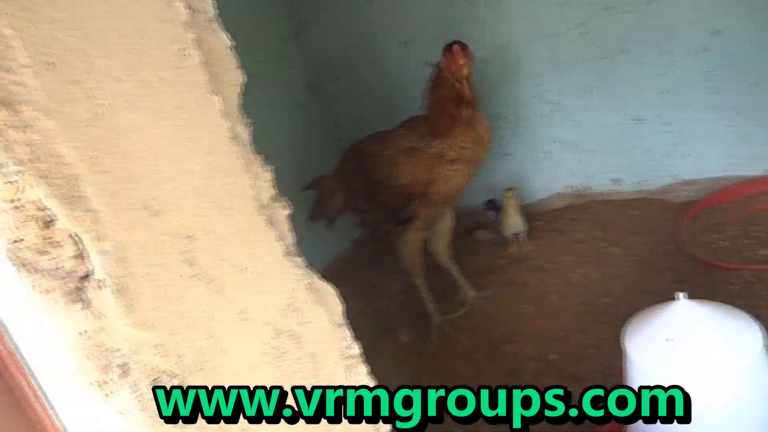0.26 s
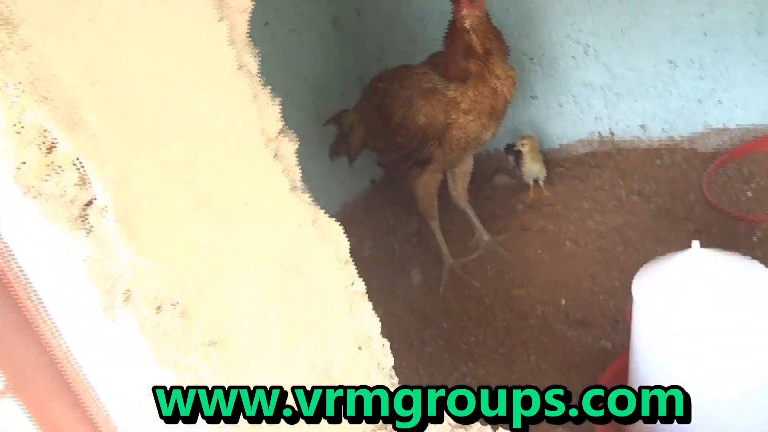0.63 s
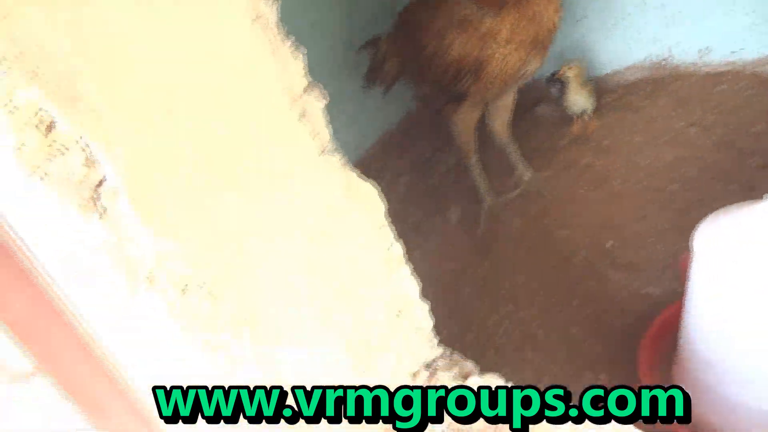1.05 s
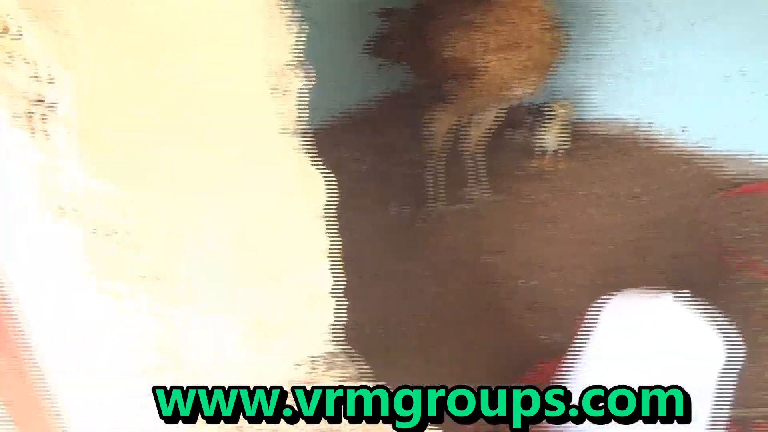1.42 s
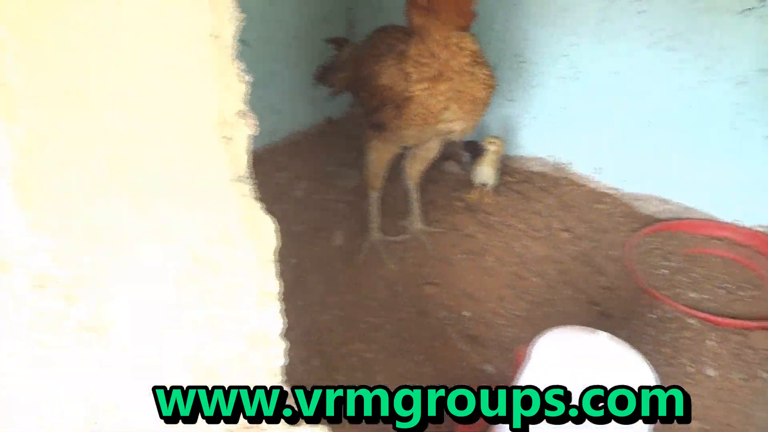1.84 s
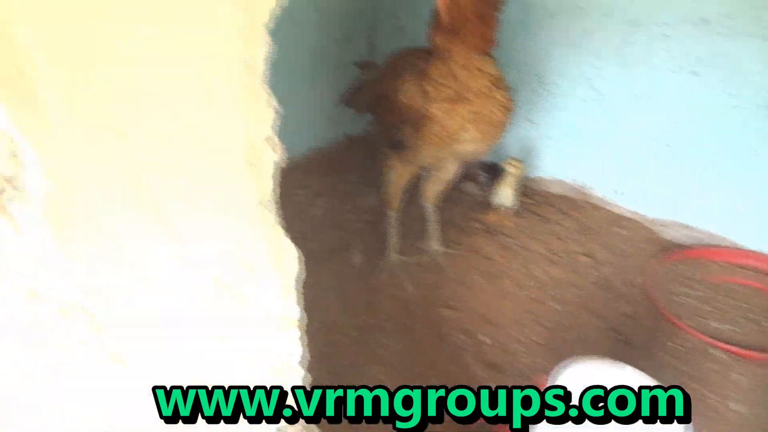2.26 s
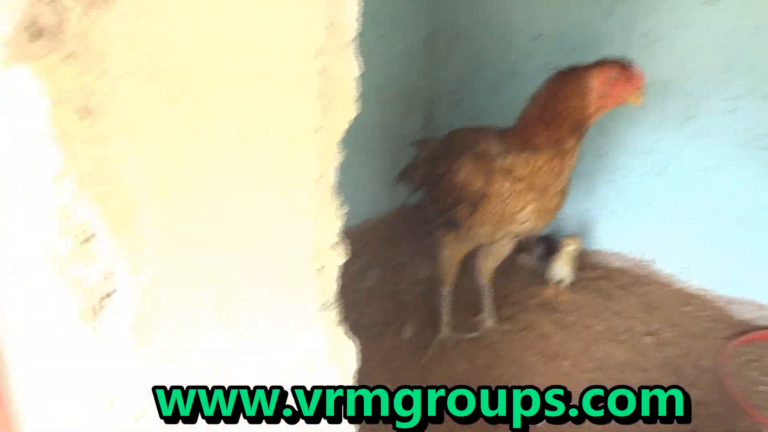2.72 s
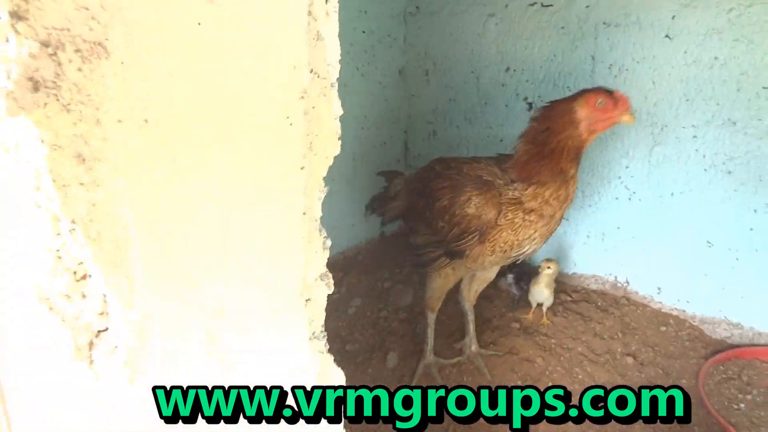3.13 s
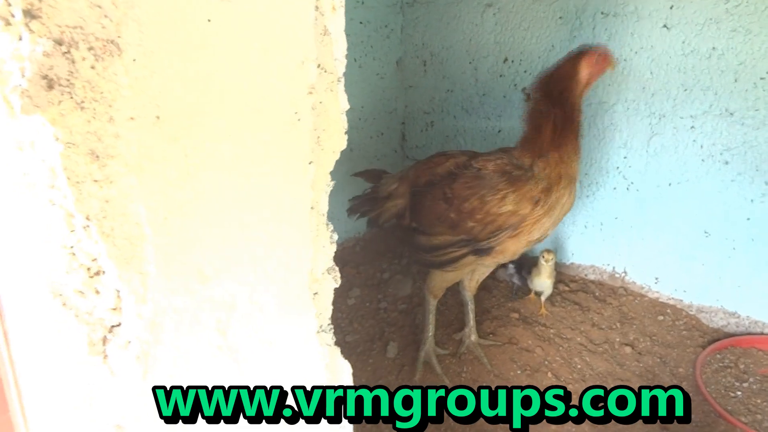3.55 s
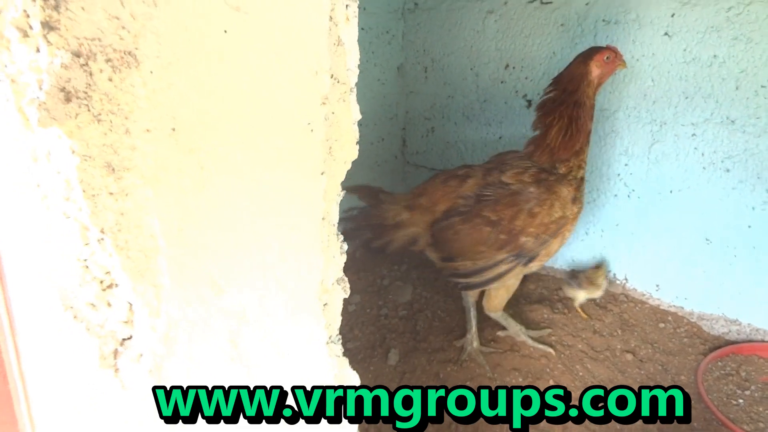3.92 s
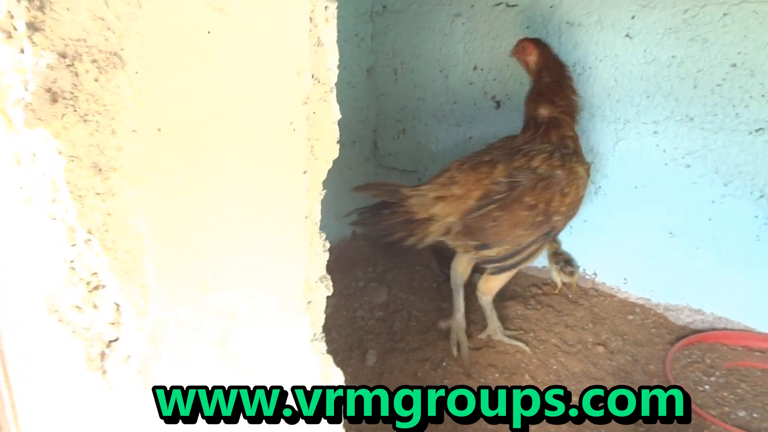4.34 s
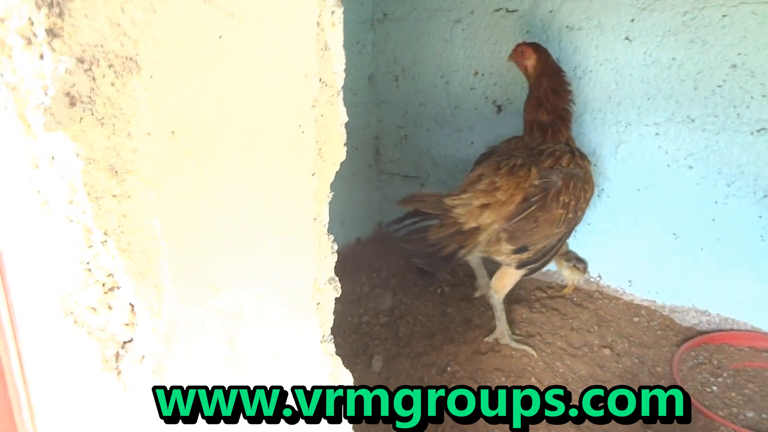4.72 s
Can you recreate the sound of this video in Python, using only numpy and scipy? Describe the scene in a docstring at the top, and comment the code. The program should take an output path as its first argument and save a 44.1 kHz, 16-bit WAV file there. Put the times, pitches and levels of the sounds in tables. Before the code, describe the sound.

A hen growls in short harsh rattling bursts, then clucks and wavers softly while a chick peeps beside her in a small shed.

```python
"""Broody hen and chick in a shed

A broody hen growls in short harsh bursts in a small plastered shed, close to the microphones, then wavers softly.
Her growl is noise and pulses from slack membranes, through resonances of chest, windpipe and mouth; her calls are
a few partials. A chick beside her and more further off peep in falling whistles. Feet scratch the litter in dry
grains and snaps, and a small metal part tinks as decaying sines. Rush, hiss and hum lie behind."""
import sys
import numpy as np
from scipy import signal
from scipy.fft import rfft, irfft, next_fast_len
from scipy.io import wavfile
from scipy.ndimage import uniform_filter1d, map_coordinates

SR = 44100
rng = np.random.default_rng(int(sys.argv[2]) if len(sys.argv) > 2 else 0)


def store_wav(level_fs):
    """Save 16-bit WAV to argv[1]."""
    pcm = np.round(np.clip(np.atleast_2d(level_fs), -1, 1) * 32767)
    wavfile.write(sys.argv[1], SR, pcm.T.astype(np.int16))


N = 219132
T = np.arange(N) / SR

# the hen's wavering calls: start_s, length_s, first_hz, middle_hz, last_hz, level_db,
# first_partial_db (over the level), roughness (0-1)
SOFT_CALLS = [(3.716, .12, 570, 675, 575, -29, -4, 0.14), (3.84, 0.079, 620, 637, 653, -54, 9.5, 0.25),
              (3.989, .065, 560, 702, 689, -29, -5.5, 0.14), (4.044, 0.084, 739, 756, 547, -32, -2.5, 0.24),
              (4.113, 0.057, 580, 556, 550, -51.5, 8.5, 0.1), (4.165, .18, 560, 710, 638, -29, -5, 0.12),
              (4.355, .14, 560, 666, 582, -31, -4.5, 0.15), (4.488, 0.05, 640, 666, 657, -48.5, 11.5, 0.3),
              (4.773, 0.08, 490, 523, 557, -39.5, 6.5, 0.11),
              (4.827, .15, 625, 635.6, 635, -35.5, -4.5, .08)]
ATTACK_S, RELEASE_S = .01, .018  # of calls and quiet notes
# background over time: time_s, rumble_db, hiss_db, far_chicks_db (before distance)
BACKGROUND = [(0.0, -44, -38, -28.5), (0.25, -46.5, -49.5, -46), (0.9, -46.5, -56.5, -48),
              (1.6, -51, -55, -45), (1.85, -44.5, -57, -39.5), (2.15, -49, -48, -42),
              (2.28, -47, -57.5, -39.5), (2.45, -38, -48, -38.5), (2.7, -47.5, -52.5, -43),
              (3.0, -46, -49, -44.5), (3.4, -43, -53.5, -43.5), (3.75, -45, -44.5, -38),
              (4.3, -41, -47.5, -44.5), (4.7, -44, -51.5, -43.5), (4.97, -43, -53, -34.5)]


def growl():
    """Slack membranes slap shut three times in every flutter cycle, unevenly, into chest, windpipe and mouth."""
    # throat colour with the beak nearly shut, half open and open: frequency_hz, density_db (per Hz)
    throat_shut = [(120, -46.5), (200, -3.5), (296, -1.5), (345, -3), (478, 2), (527, 1), (824, -18.5),
                   (889, -20), (1070, -2.5), (1220, -19), (1390, -10), (1790, -18.5), (2700, -26),
                   (3510, -36), (5940, -120)]
    throat_half = [(120, -58), (200, -28.5), (307, -12.5), (431, -7), (629, 1), (930, -6.5), (1190, -17),
                   (1630, -22.5), (2090, -33.5), (2290, -19), (3380, -22.5), (4500, -33.5), (5850, -107),
                   (9900, -120)]
    throat_open = [(120, -61), (200, -35.5), (311, -1), (420, -4), (473, 3), (538, 12.5), (629, 12.5),
                   (736, -5.5), (872, 17), (1160, -3.5), (1310, -21), (1450, -6.5), (4500, -45),
                   (5850, -72), (9900, -120)]
    # resonance of the chest, passed twice: centre_hz, width_hz, level_db
    chest = [(198, 146, 0)]
    # mouth with the beak nearly shut, open and wide open: centre_hz, width_hz, level_db
    mouth_shut = [(3060, 105, 8), (3460, 52, -8), (4600, 71, -19), (4565, 13, -8)]
    mouth_open = [(2570, 110, 17), (3280, 62, 15.5), (3610, 1200, -4.5)]
    mouth_wide = [(1960, 79, 7), (2510, 110, 4), (3900, 87, 1)]
    # tongue and beak edges: centre_hz, width_hz, level_db
    edges = [(5890, 200, -2), (6500, 170, 6), (7300, 150, -1), (7970, 150, 2), (10350, 200, -4),
             (11700, 200, -2), (12350, 180, -2), (13500, 300, -10), (8300, 13300, -14)]
    flutter_hz, puff_s = 60.17, .0028
    jitter, scatter_db = .17, 2.5  # unevenness of the slaps in time and strength
    breathy, throb, leak = .55, .4, .3
    chest_follows = .6  # dB of chest per dB of drive
    wide_from = .88  # beak opening above which the mouth_wide resonances come in

    drive, beak, deeper_db = effort()
    beak = np.clip(beak, 0, 1)
    chest_db = -18 + (-34.5 + 18) * beak  # beak shut to open, as in the next two
    mouth_db = -7 + (-24.5 + 7) * beak
    edges_db = -15 + (-31.5 + 15) * beak

    flutter = np.cumsum(flutter_hz * (1 + .07 * wobble(14))) / SR  # in cycles
    slaps = np.flatnonzero(np.diff(np.floor(3 * flutter + jitter * wobble(180))) > 0)
    pulses = np.zeros(N)
    pulses[slaps] = amp(scatter_db * rng.standard_normal(len(slaps)))
    # air escapes after each slap, over a steady leak
    puffs = leak + signal.lfilter([1], [1, -np.exp(-1 / (puff_s * SR))], pulses)
    soft_slaps = filtered(unit(pulses), lambda f: 1 / (1 + 1j * f / 4000))  # a slap is not sharp
    swell = 1 + throb * np.sin(2 * np.pi * flutter)
    source = swell * (soft_slaps + breathy * unit(puffs * rng.standard_normal(N)))
    airy = swell * (0.039 * unit(pulses) + unit(puffs * rng.standard_normal(N)))

    def through(x, control, response):
        """A controlled source sent through a resonator, scaled by the level it gives uncontrolled."""
        return filtered(x * control, response) / np.std(filtered(x, response))

    chest_drive = drive ** chest_follows * amp(chest_db + deeper_db)
    voice = through(source + airy, chest_drive, lambda f: modes(chest)(f) ** 2)
    for opening, throat in [(0, throat_shut), (.5, throat_half), (1, throat_open)]:
        share = np.clip(1 - 2 * abs(beak - opening), 0, 1)  # the throat's shape follows the beak
        voice += through(source, drive * np.sqrt(share), windpipe(throat))
    wide = np.clip((beak - wide_from) / (1 - wide_from + 1e-3), 0, 1)
    mouths = [(1 - beak ** 2, mouth_shut), (beak ** 2 * (1 - wide), mouth_open), (3 * wide, mouth_wide)]
    for share, mouth in mouths:
        ring = lambda f: modes(mouth)(f) * f ** 2 / (f ** 2 + 2200 ** 2)
        voice += through(source, drive * amp(mouth_db) * np.sqrt(share), ring)
    hiss = lambda f: modes(edges)(f) * f ** 4 / (f ** 4 + 4500 ** 4)
    return voice + through(airy, drive * amp(edges_db), hiss)


def effort():
    """Drive, beak opening and extra chest dB of the slack membranes: growls, clucks and the rattle under calls."""
    # long growls, one list of points each: time_s, level_db, beak_opening (0-1)
    growl_points = [
        [(0.0, -16, 0.7), (0.06, -17, 0.64), (0.15, -19.5, 0.57), (0.22, -18, .7), (0.295, -23.5, 0.67),
         (0.33, -35.5, 0.34), (0.36, -80, 0.6)],
        [(0.38, -45, 0.6), (0.45, -35, 0.46), (0.53, -46.5, 0.38), (0.66, -41, 0.5), (0.79, -54, 0)],
        [(1.017, -25.5, .9), (1.04, -16, 1), (1.17, -17, 0.91), (1.32, -20, 0.81), (1.4, -18, 0.43),
         (1.6, -18.5, 0.22), (1.65, -21, 0.22), (1.69, -33, 0), (1.73, -83, .1)],
        [(1.893, -28.5, 0), (1.91, -22, 0.13), (1.965, -25, 0.09), (2.06, -20, 0.21), (2.155, -19.5, .2),
         (2.2, -29, 0.08), (2.24, -58, 0)],
        [(2.877, -29, 0.77), (2.905, -19.5, 0.37), (2.93, -16.5, .75), (3.1, -18, 0.73), (3.125, -30, 0.33),
         (3.165, -65, 0)],
        [(3.57, -24, 0.24), (3.6, -26.5, 0.36), (3.65, -24.5, 0.37), (3.707, -24.5, 0.48), (3.73, -60, 0.7)],
    ]
    # clucks: start_s, length_s, level_db, beak_opening (0-1)
    clucks = [(1.002, 0.0073, -36, 0.9), (2.478, .045, -20, 0.21), (2.544, 0.023, -26.5, 0.3),
              (2.796, 0.0071, -25.5, .5), (2.818, 0.029, -14.5, 0.49), (3.46, 0.0053, -33, 0.46),
              (3.485, .075, -15.5, 0.52), (3.914, 0.048, -19.5, 0.62), (4.209, 0.062, -19, 0.5),
              (4.582, 0.039, -19.5, 0.5), (4.645, 0.018, -37, 0.33), (4.702, 0.032, -46.5, .5),
              (4.743, 0.039, -39, 0.32), (4.901, 0.045, -22, 0.39)]
    start_db, end_db = -8, -4  # of a cluck, relative to its peak
    peak_place, cluck_release_s = .45, .025  # place of the peak in the cluck, 0-1
    cluck_chest_db = 6  # a cluck is pushed from deeper in the chest than a growl
    rattle_db, rattle_beak = 6.5, .5

    tables = [[(*row, 0) for row in rows] for rows in growl_points]
    for s, length, db, beak in clucks:
        shape = [(0, start_db), (peak_place * length, 0), (length, end_db), (length + cluck_release_s, -35)]
        tables.append([(s + t, db + change_db, beak, cluck_chest_db) for t, change_db in shape])
    # the slack membranes rattle along under each call, in step with its roughness
    for s, length, _, _, _, db, _, rough in SOFT_CALLS:
        rough_db = 20 * np.log10(np.clip(rough, .05, 1))
        tables.append(burst(s, length, db + rattle_db + rough_db, ATTACK_S, RELEASE_S, rattle_beak, 0))
    return loudest(tables)


def windpipe(throat):
    """Narrow fixed resonances standing on the throat's broad colour."""
    # windpipe resonances: centre_hz, width_hz, level_db
    pipe = [(299, 20.4, 2.5), (400, 24, 0.5), (485, 12.5, 0), (600, 160, -12), (827, 54, 0.5),
            (1046, 39, -3), (1407, 35, -1), (1530, 19, -20), (1695, 11, -25), (2080, 61, 7),
            (2245, 66, 1.5)]

    def gain(f):
        peaks = sum(abs(modes([mode])(f)) ** 2 for mode in pipe)
        return amp(along(throat, f)) * np.sqrt(1 + 2 * peaks)
    return causal(gain)


def calls():
    """A taut membrane sings a few partials; roughness shakes pitch and strength and sets every second cycle apart."""
    # the pitch glides from its first value to the middle one, then to its last
    glide_in_s, glide_out_s = .02, .026
    first_slope_db, second_slope_db = 3, -9.5  # partial level per 100 Hz that the pitch is under the middle one
    third_hz, third_width_hz = 1970, 90  # a mouth resonance that favours the third partial
    out = np.zeros(N)
    shakes = np.array([wobble(60), wobble(90), wobble(150)])
    for s, length, first_hz, middle_hz, last_hz, db, first_db, rough in SOFT_CALLS:
        start = round(s * SR)
        t = T[:min(round(length * SR), N - start)]
        slow, middle, fast = np.clip(rough, .05, 1) * shakes[:, start:][:, :len(t)]
        glide_in_hz = (first_hz - middle_hz) * np.exp(-t / glide_in_s)
        glide_out_hz = (last_hz - middle_hz) * np.exp((t - length) / glide_out_s)
        pitch_hz = middle_hz + glide_in_hz + glide_out_hz
        under = (middle_hz - pitch_hz) / 100
        first = amp(first_slope_db * under) * amp(first_db + 25.0 * middle)
        second = amp(second_slope_db * under)
        third = np.sqrt(second) * amp(-14.5) / np.hypot(1, (3 * pitch_hz - third_hz) / third_width_hz)
        phase = 2 * np.pi * np.cumsum(pitch_hz * (1 + .12 * fast)) / SR
        # the half-pitch partial makes every second cycle differ
        tone = first * (np.sin(phase) + rough * amp(-8) * np.sin(phase / 2))
        tone += second * np.sin(2 * phase)
        tone += third * (np.sin(3 * phase) + amp(-14) * np.sin(4 * phase))
        add(out, s, np.sqrt(2) * amp(db + 7 * slow) * fade(t, length) * tone)
    return out


def quiet_notes():
    """Quiet low notes and two short higher clucks: six thin wavering partials."""
    # notes and clucks: start_s, length_s, first_hz, last_hz, level_db
    notes = [(0.379, 0.19, 199.4, 187.5, -41), (0.415, 0.053, 463, 464, -38), (0.575, 0.022, 695, 690, -26),
             (0.589, 0.215, 243.8, 239.3, -46.5)]
    # throat gain for each partial: frequency_hz, level_db
    throat = [(150, 1), (500, -1), (850, -3), (1200, -26), (1600, -43)]
    out, waver = np.zeros(N), wobble(29.76)
    for s, length, first_hz, last_hz, db in notes:
        t = T[:round(length * SR)]
        shake = waver[round(s * SR):][:len(t)]
        pitch_hz = (first_hz + (last_hz - first_hz) * t / length) * (1 + .012 * shake)
        phase = 2 * np.pi * np.cumsum(pitch_hz) / SR
        tone = np.zeros(len(t))
        for k in range(1, 7):
            partial_db = along(throat, k * pitch_hz) + 3 * np.roll(shake, 900 * k)
            tone += amp(partial_db) * np.sin(k * phase)
        add(out, s, amp(db) * unit(tone) * fade(t, length))
    return out


def chick():
    """The chick beside the hen gives single falling peeps."""
    # peeps: start_s, length_s, first_hz, last_hz, level_db
    peeps = [(0.291, 0.039, 3700, 2830, -36.5), (0.382, 0.046, 4500, 3010, -31.5),
             (0.404, 0.071, 3600, 3100, -38), (0.511, 0.039, 4500, 3050, -32),
             (0.493, 0.028, 5150, 4900, -50), (0.69, 0.023, 5120, 4950, -50),
             (0.564, 0.033, 3500, 2470, -39), (0.623, 0.026, 3900, 3300, -38),
             (0.704, 0.046, 4500, 3020, -31), (1.692, 0.04, 3400, 2970, -46),
             (1.71, 0.037, 4200, 3900, -42), (1.858, 0.012, 3400, 3020, -41), (2.228, .03, 3450, 3080, -51),
             (2.666, 0.052, 4500, 3700, -43), (3.136, 0.038, 3600, 2930, -36.5),
             (3.22, 0.014, 3400, 2970, -45), (3.244, 0.026, 3900, 3210, -37),
             (3.289, 0.064, 4150, 3780, -42), (3.35, 0.042, 3900, 3120, -38),
             (3.643, 0.045, 4500, 3360, -33), (3.982, 0.025, 4200, 2840, -29),
             (4.022, 0.041, 3700, 3480, -37), (4.072, 0.044, 4300, 3060, -31),
             (4.161, 0.045, 3500, 3070, -41), (4.196, 0.03, 4600, 3640, -36),
             (4.312, 0.079, 3800, 2954, -45), (4.402, 0.074, 4600, 2930, -39),
             (4.536, 0.038, 4700, 3700, -37.5), (4.604, 0.048, 4000, 3530, -34.5),
             (4.809, 0.063, 4900, 3480, -37)]
    out = np.zeros(N)
    for s, *shape in peeps:
        add(out, s, peep(*shape))
    return out


def peep(length, first_hz, last_hz, db):
    """A thin, slightly shaky whistle that holds, then glides to its last pitch, with a weak octave."""
    u = np.linspace(0, 1, round(length * SR))
    shake = uniform_filter1d(rng.standard_normal(len(u)), size=40)
    pitch_hz = first_hz + (last_hz - first_hz) * np.clip(1.4 * u - .3, 0, 1)
    phase = 2 * np.pi * np.cumsum(pitch_hz * (1 + 0.19 * shake)) / SR
    return amp(db) * np.sin(np.pi * u) ** 0.4 * (np.sin(phase) + 0.067 * np.sin(2 * phase))


def feet():
    """Dense dry grains under each scratch, and single snaps with a dull knock."""
    # scratches: start_s, length_s, crackle_db, crunch_db (over the crackle)
    scratches = [(0.795, .1, -37, 2.5), (0.903, 0.07, -45, 6.5), (2.323, .1, -44.5, -6.5),
                 (2.438, 0.0082, -31.5, -4), (2.479, 0.095, -37.5, -1), (3.749, 0.12, -44.5, -7)]
    # litter snaps: time_s, level_db, knock_db (over the snap)
    snaps = [(0.1312, -30.5, 15.5), (0.193, -34.5, 13), (0.621, -46, 13), (0.7676, -49, 23.5),
             (0.8042, -42.5, 23.5), (0.821, -38, 19), (0.844, -32, 12), (0.8867, -38, -2),
             (0.9191, -40.5, 24), (0.9382, -43, 5), (0.9636, -46, 18), (1.037, -49, 15), (1.052, -43, -4),
             (1.875, -55, 15), (1.902, -37, -5), (2.091, -39, -4), (2.4443, -32, -7), (2.466, -44, 2),
             (2.475, -38, 11), (2.4972, -26.5, 0), (2.549, -28, -14), (2.5702, -22.5, 5), (2.589, -37, -14),
             (2.772, -43, -15), (2.7985, -44, 3), (2.827, -31, -7), (3.1863, -34, -13), (3.221, -44, -7),
             (3.4506, -35.5, -24), (3.497, -27.5, -15), (3.7853, -37, -29), (3.8671, -31.5, -14),
             (4.1086, -33.5, 4), (4.5805, -41, 13), (4.613, -41.5, 20)]
    # colour of the dry litter: frequency_hz, density_db (per Hz)
    litter = [(2060, -21), (3500, 3), (5390, 12.5), (9440, 9), (10500, 9), (14500, -14.5), (16000, 7.5)]
    rise_s, fall_s = 0.0059, 0.017
    grains_per_s, spread_db = 3000, 3
    tables = [burst(s, length, db, rise_s, fall_s, over_db) for s, length, db, over_db in scratches]
    level, crunch_db = loudest(tables)
    struck = rng.random(N) < grains_per_s / SR
    grains = struck * amp(spread_db * rng.exponential(size=N)) * rng.standard_normal(N)
    clumps = grains * amp(4.5 * wobble(90))  # claws catch and slip
    crackle = unit(filtered(grains, causal(lambda f: amp(along(litter, f)))))
    body = modes([(900, 500, 2.5), (1654, 130, 8.5), (2130, 790, 2.5), (3750, 1400, -3.5)])
    out = level * (crackle + amp(crunch_db) * unit(filtered(clumps, body)))
    t = T[:SR // 20]
    for s, db, knock_db in snaps:
        # the snap falls 60 dB in 25 ms, the knock in 14 ms
        snap = amp(db - 60 * t / .025) * signal.lfilter([1, 0, -1], [1], rng.standard_normal(len(t)))
        knock = amp(db + knock_db - 60 * t / .014) * np.sin(2 * np.pi * rng.uniform(1600, 2400) * t)
        add(out, s, snap + knock)
    return out


def tink():
    """A small metal part is touched twice in quick succession; its modes ring and die as sines."""
    # touches: time_s, level_db
    touches = [(3.306, -21), (3.311, -18)]
    # modes of the metal part: frequency_hz, level_db, t60_s
    metal = [(8543, -18, .12), (11270, 0, .05), (11520, -14, .045), (13640, -14, .045), (14280, -24, .04)]
    out, t = np.zeros(N), T[:SR // 8]
    ring = sum(amp(db - 60 * t / t60) * np.sin(2 * np.pi * hz * t) for hz, db, t60 in metal)
    onset = 1 - np.exp(-t / 0.00078)
    for s, db in touches:
        add(out, s, amp(db) * ring * onset)
    return out


def brood():
    """More chicks further off: 420 overlapping peeps at random times, with their level over time."""
    out = np.zeros(N + SR)
    for when, long, high, fall, loud in rng.random((420, 5)):
        first_hz = 3400 + 1500 * high
        last_hz = first_hz * (.72 + 0.205 * fall)
        sound = peep(0.034 + 0.045 * long, first_hz, last_hz, 4 * loud)
        add(out, when * N / SR, sound)
    return amp(background_db(3)) * unit(out[:N])


def air():
    """A slightly unsteady noise rush, treble hiss and a low hum of noise through narrow resonances."""
    # colour of the air: frequency_hz, density_db (per Hz)
    colour = [(12, -32), (20, -2), (74, 0), (146, -10.5), (388, -10), (446, -16), (738, -12.5), (802, -20),
              (897, -10.5), (976, -19.5), (2260, -26), (3440, -16), (6360, -20), (10200, -15),
              (16000, -26.5)]
    # distant hum, resonances passed twice: centre_hz, width_hz, level_db
    motor = [(46, 14, -0.5), (62.8, 6.1, 3), (91.9, 11.7, -0.5), (28, 13, -4)]
    unsteady_db = 1.5 * wobble(7)
    rush = amp(-48 + unsteady_db) * noise(lambda f: amp(along(colour, f)) * (f > 110) * (f < 5500))
    hiss = amp(background_db(2) + wobble(12)) * noise(lambda f: amp(along(colour, f)) * (f > 5500))
    hum = amp(background_db(1) - 4) * noise(lambda f: modes(motor)(f) ** 2)
    return rush + hiss + hum


def shed(x):
    """The walls answer after a short delay; each frequency of the answer dies at its own speed."""
    # decay of the plastered walls: frequency_hz, t60_s
    walls = [(150, 0.031), (1000, 0.13), (4000, 0.062), (14000, 0.02)]
    hz, t, z = signal.stft(rng.standard_normal(SR // 3), SR, nperseg=256)
    tail = signal.istft(z * amp(-60 * t / along(walls, hz)[:, None]), SR, nperseg=256)[1]
    delayed = np.pad(x, (150, 0))  # in samples
    return signal.fftconvolve(delayed, tail / np.linalg.norm(tail))[:N]


def amp(db):
    """Gain of a level in dB."""
    return 10 ** (np.asarray(db) / 20)


def unit(x):
    """Scaled to rms 1."""
    return x / np.sqrt(np.mean(x ** 2) + 1e-20)


def along(points, hz):
    """Value at hz between (Hz, value) points on a log frequency axis."""
    f, v = np.transpose(points)
    return np.interp(np.log(hz + 1), np.log(f + 1), v)


def wobble(rate):
    """A smooth random curve, rate knots a second."""
    return map_coordinates(rng.standard_normal(int(N * rate / SR) + 4), [T * rate])


def filtered(x, response):
    """The sound x times a complex response of frequency."""
    m = next_fast_len(N + SR // 2)
    return irfft(rfft(x, m) * response(np.fft.rfftfreq(m, 1 / SR)), m)[..., :N]


def modes(table):
    """Causal response of (Hz, width Hz, dB) resonances, summed with alternating sign."""
    def response(f):
        total = 0
        for k, (centre, width, db) in enumerate(table):
            damping = 1j * f * width
            total = total + (-1) ** k * amp(db) * damping / (centre * centre - f * f + damping)
        return total
    return response


def causal(gain):
    """Minimum-phase response with the given gain over frequency, by folding the cepstrum."""
    def response(f):
        c = irfft(np.log(gain(f) + 1e-4))
        c[1:len(c) // 2] *= 2
        c[len(c) // 2 + 1:] = 0
        return np.exp(rfft(c))
    return response


def noise(response):
    """Coloured noise of rms 1."""
    return unit(filtered(rng.standard_normal(N), response))


def fade(t, length):
    """Straight rise and fall of a call or quiet note."""
    return np.clip(t / ATTACK_S, 0, 1) * np.clip((length - t) / RELEASE_S, 0, 1)


def background_db(column):
    """One column of the background levels, per sample."""
    points = np.transpose(BACKGROUND)
    return np.interp(T, points[0], points[column])


def burst(s, length, db, rise, fall, *more):
    """Table of a sound that rises, holds and falls."""
    end = s + max(length, rise)
    return [(s, db - 20, *more), (s + rise, db, *more), (end, db, *more), (end + fall, db - 30, *more)]


def loudest(tables):
    """Gain and further columns per sample of (s, dB, ..) tables; where they overlap the loudest rules."""
    cols = []
    for s, db, *more in map(np.transpose, tables):
        cols.append([np.interp(T, s, db, left=-120, right=-120)] + [np.interp(T, s, c) for c in more])
    ruling = np.argmax([c[0] for c in cols], axis=0)
    level_db, *more = np.take_along_axis(np.array(cols), ruling[None, None], axis=0)[0]
    gain = uniform_filter1d(amp(level_db), size=150, mode="nearest")
    return [gain] + [uniform_filter1d(c, size=400, mode="nearest") for c in more]


def add(into, s, sound):
    """Sum a short sound into a track at time s."""
    part = into[round(s * SR):][:len(sound)]
    part += sound[:len(part)]


def scene():
    """Near sources with a little of the walls, far chicks mostly walls, on two microphones."""
    far = brood()
    hen = growl() + feet() + tink()
    song = calls() + quiet_notes() + chick()
    walls = shed(amp(-7.5) * hen + amp(-8.5) * song + amp(-7) * far)
    front = hen + song + 0.097 * far + walls
    t = T[:SR // 50]
    early = rng.standard_normal(len(t)) * amp(-60 * t / 0.02)
    # the nearest wall reaches the two microphones unequally
    near_wall = signal.fftconvolve(front, early / np.linalg.norm(early))[:N]
    side = amp(-16.5) * (near_wall + 0.52 * shed(front))
    balance_db = [[-.2], [.2]]  # left, right
    return (front + air()) * amp(balance_db) + np.array([side, -side])


def record(dry):
    """The microphone dulls the top octave, the preamplifier rounds the highest peaks; a band limit cuts the rest."""
    top_hz = 15950
    dull = filtered(dry, lambda hz: 1 / np.sqrt(1 + (hz / 13000) ** 6))
    soft = dull / (1 + abs(dull / .7) ** 4) ** (1 / 4)
    return filtered(soft, lambda hz: hz < top_hz)


dry = scene()
out = record(dry)
store_wav(out)
```